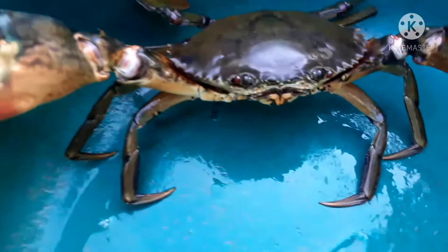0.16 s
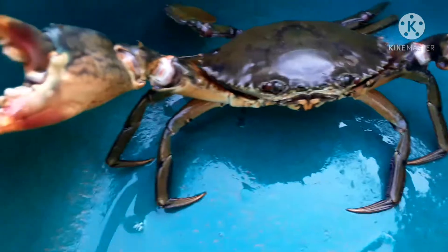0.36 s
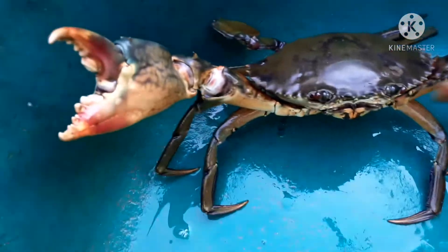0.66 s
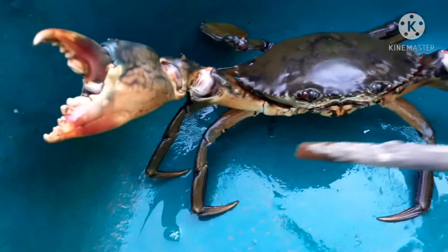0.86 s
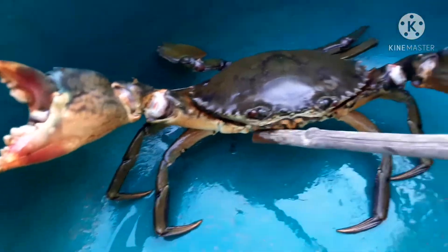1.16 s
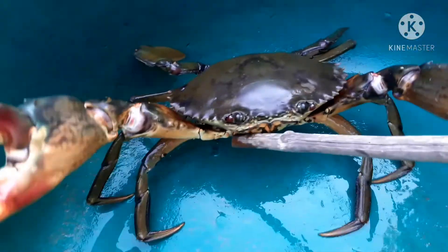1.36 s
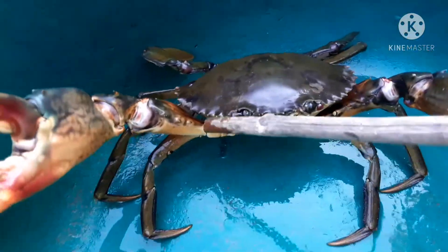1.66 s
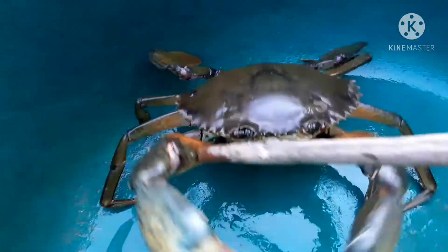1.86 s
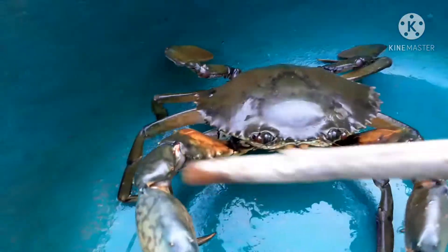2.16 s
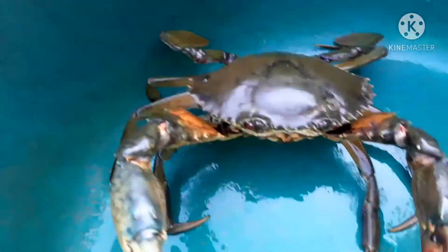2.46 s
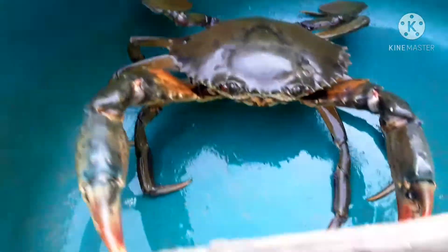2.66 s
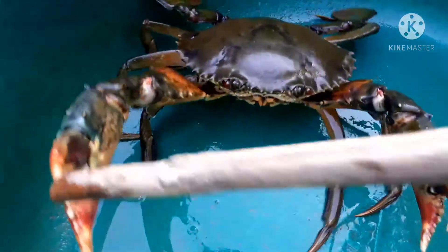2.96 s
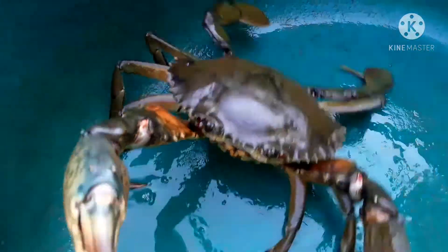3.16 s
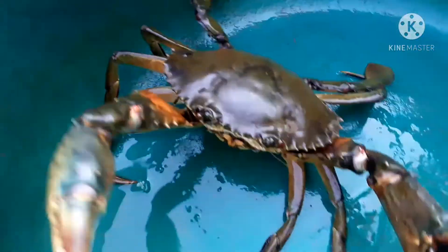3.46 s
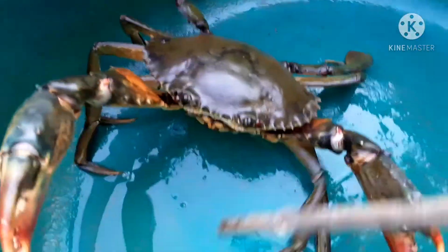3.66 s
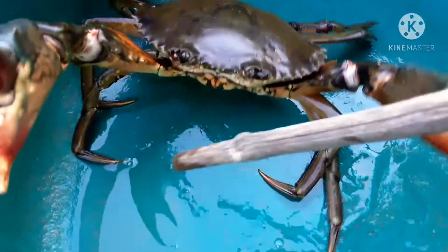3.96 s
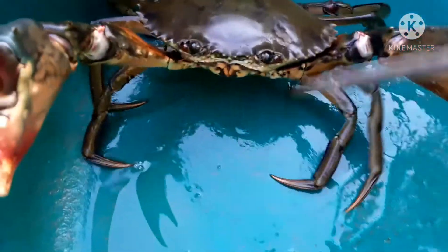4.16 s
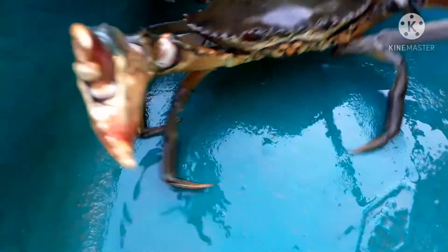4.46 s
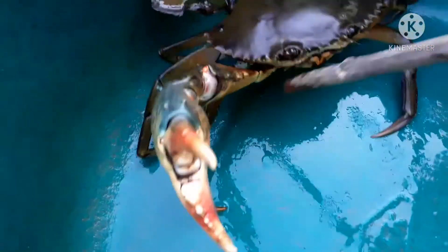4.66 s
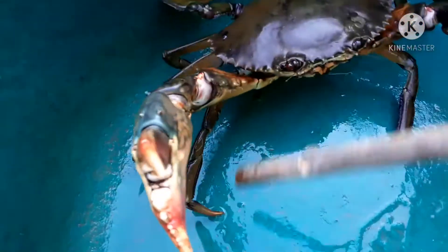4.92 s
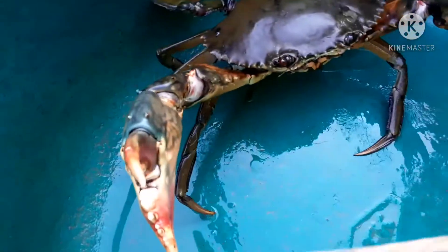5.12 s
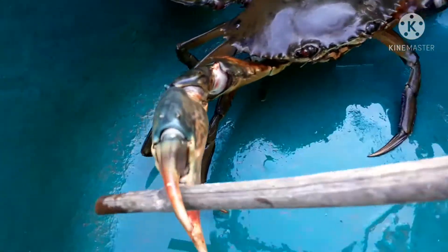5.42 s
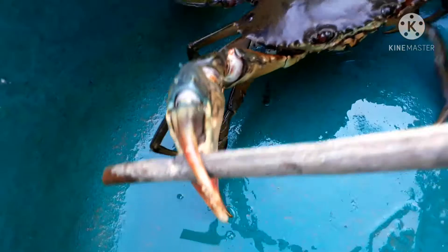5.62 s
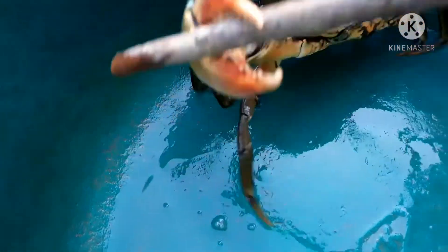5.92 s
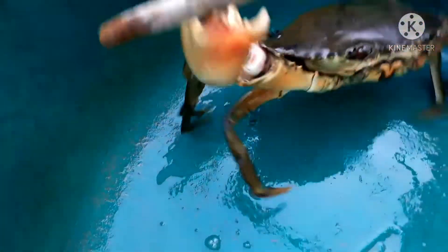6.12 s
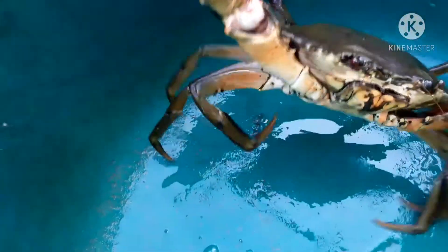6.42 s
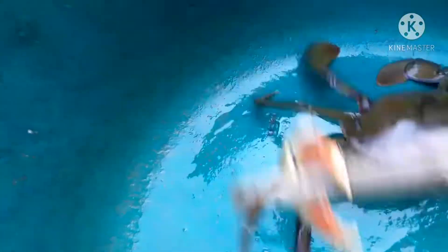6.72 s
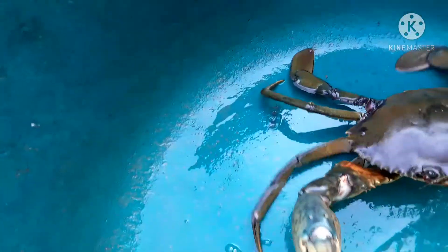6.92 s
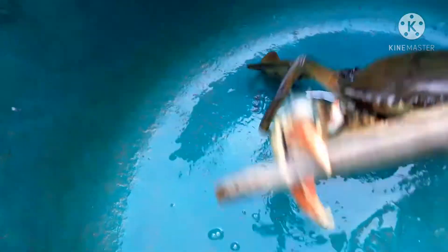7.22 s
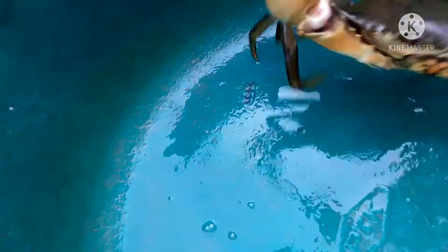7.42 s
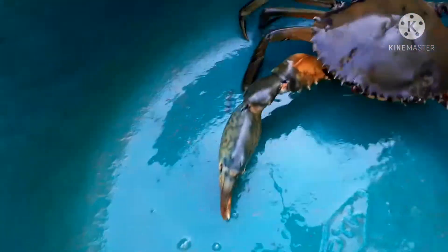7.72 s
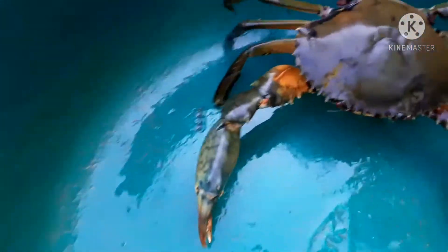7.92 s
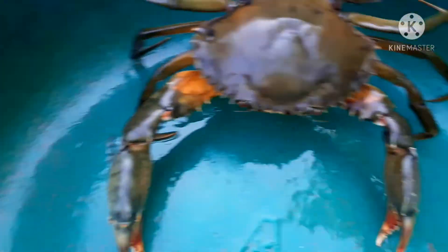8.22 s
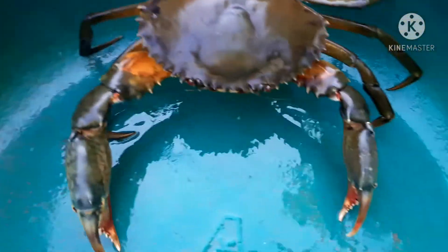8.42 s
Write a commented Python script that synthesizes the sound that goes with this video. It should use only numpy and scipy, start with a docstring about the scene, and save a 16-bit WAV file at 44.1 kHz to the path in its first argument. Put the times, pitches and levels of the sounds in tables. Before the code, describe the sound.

A faint outdoor hiss and a low, wavering distant motor run throughout. In the first two seconds far birds whistle thinly with some echo, while the crab's legs make very quiet scuffs in the wet plastic basin close by. A dry tick at 1.2 and a cluster of clacks around 1.7 mark stick against shell, with tiny very high squeaks near 1.9. Around 3.1 a coarse drag grates over the floor, and a nearby bird chirps brightly in quick notes until 3.75. Sharp clicks at 4.2 lead into busy scuffs and knocks from 4.3 to 4.8. After a lull, clacks rattle at 5.3 and scuffs build near 5.75. Strong wet scrapes grind at 6.2 and 6.7 to 6.9, with a thump at 6.8. The loudest hollow, booming knocks burst at 7.6 to 7.8, then a soft low slide from 8.3 fades with a last small click.

```python
"""A distant motor hums from the start, under faint outdoor hiss and the whistling of far birds.
A crab is prodded with a wooden stick in a wet plastic basin close by: stick-slip scrapes its legs over the floor,
impacts on shell and stick excite short damped modes, and soft and hard thumps set the basin's low modes booming.
Wet shell squeaks briefly, and a nearby bird chirps as a frequency-modulated whistle with faint overtones."""
import sys
import numpy as np
from scipy import signal
from scipy.fft import rfft, irfft
from scipy.io import wavfile
from scipy.ndimage import uniform_filter1d

SR = 44100
rng = np.random.default_rng(int(sys.argv[2]) if len(sys.argv) > 2 else 0)


def output_pcm(signal):
    """Save a mono or channel-first signal as 16-bit PCM at the path in sys.argv[1].

    Samples are clipped to [-1, 1] before scaling.
    """
    pcm = np.clip(np.atleast_2d(signal).T, -1, 1) * 32767
    wavfile.write(sys.argv[1], SR, np.round(pcm).astype(np.int16))


N = 378378

# spectrum of the outdoor hiss: f/Hz, relative level/dB
AIR_SPECTRUM = [(100, 2.5), (600, 5), (1500, -14), (4000, -18), (7500, -14), (10000, -26.5), (15000, -18.5)]
# strength of the distant motor, used relative to its median: t/s, level/dB
MOTOR_LEVEL = [(0.0, -30), (0.5, -39), (1.0, -34), (3.2, -34.5), (4.6, -36), (5.0, -38), (6.8, -36),
               (7.3, -38.5), (8.2, -45), (8.58, -40)]
# spectrum of the motor's rumble: f/Hz, relative level/dB
MOTOR_SPECTRUM = [(15, -73), (25, -51.5), (29, -28.5), (35, -48.5), (54, -3), (70, -2), (108, -1.5),
                  (161, -5), (193, 0.5), (209, -4.5), (227, -9), (265, -20.5), (387, -37.5), (420, -35),
                  (550, -38.5), (920, -120)]
# far birds, one list a syllable: t/s, pitch f/Hz, relative level/dB, rasp/1 (0 to 1)
FAR_SYLLABLES = [
    [(0.008, 3420, -49, 0.45), (0.05, 3030, -53, 0.22), (0.12, 3260, -59, 0.2)],
    [(0.07, 4056, -57, 0.1), (0.12, 4130, -47.5, 0.12), (0.25, 4220, -57, 0.22), (0.38, 4254, -52, 0.26),
     (0.52, 4136, -51, 0.044), (0.61, 4030, -55, 0.037)],
    [(0.355, 2900, -54, 0.15), (0.387, 2150, -61, .15), (0.415, 3150, -58, 0.15), (0.45, 3270, -69, 0.19),
     (0.495, 4000, -47, 0.15)],
    [(0.75, 3420, -68, 0.14), (0.98, 3640, -54, 0.2), (1.15, 3356, -61, 0.043), (1.28, 3420, -54, 0.024)],
    [(0.83, 1574, -67, 0.059), (0.95, 1586, -58, 0.22), (1.06, 1580, -84.5, 0.11)],
    [(1.27, 1450, -68, 0.088), (1.42, 1585, -73.5, 0.17), (1.6, 1430, -64, 0.087)],
    [(1.5, 4350, -69, .1), (1.58, 4530, -63.5, 0.063), (1.78, 4630, -56, 0.13), (1.88, 4580, -52, 0.13)],
    [(5.03, 5130, -67, 0.36), (5.08, 5250, -72, 0.27)],
    [(5.15, 5140, -67, 0.24), (5.22, 5170, -67, 0.27)],
]
# near bird, one list a syllable: t/s, pitch f/Hz, relative level/dB, rasp/1 (0 to 1)
NEAR_SYLLABLES = [
    [(3.025, 2395, -41.5, 0.84), (3.052, 2580, -27.5, 0.36), (3.068, 3296, -19, 0.38),
     (3.085, 3305, -18.5, 0.13), (3.102, 3400, -40.5, .5)],
    [(3.305, 1980, -39.5, 0), (3.322, 1920, -29, 0.1), (3.335, 2680, -24, 0.5), (3.341, 2818, -15, 0),
     (3.354, 2740, -14, 0), (3.374, 2690, -19.5, 0.08)],
    [(3.456, 3660, -68, 0.1), (3.467, 3410, -21.5, 0), (3.473, 2550, -24, 0.17), (3.479, 3275, -18, 0.05),
     (3.488, 3200, -17, 0.12), (3.498, 3310, -26, .05)],
    [(3.562, 1780, -38.5, 0), (3.598, 2240, -33.5, 0.8), (3.606, 2930, -19.5, 0.65),
     (3.614, 3227, -19, 0.5), (3.628, 2850, -24.5, 0.74), (3.657, 2600, -30.5, 0.4),
     (3.683, 2686, -27.5, 0.5), (3.697, 2340, -26, 0), (3.713, 2360, -29, 0.2)],
    [(3.716, 1834, -37.5, 0.3), (3.738, 1983, -28.5, .15), (3.755, 1880, -41, 0)],
]
# wet shell squeaking on plastic, one list a squeak: t/s, pitch f/Hz, relative level/dB, rasp/1 (0 to 1)
SHELL_SQUEAKS = [
    [(1.379, 15000, -43, 0.44), (1.382, 15100, -38, .4), (1.386, 14800, -56, .4)],
    [(1.911, 15300, -37, .4), (1.9135, 15000, -23, 0.44), (1.917, 14800, -46, .4)],
    [(1.943, 14200, -44, .6), (1.946, 12600, -26, 0.73), (1.949, 9500, -46, .6)],
    [(1.953, 15400, -37, .6), (1.955, 12300, -26, .6), (1.958, 6400, -23, .6)],
]
# modes of the basin floor: f/Hz, relative level/dB, decay time t60/s
BASIN_MODES = [(50, -27, 0.27), (178.2, -4, 0.13), (217.7, 4, 0.079), (450, -8, 0.083), (596.4, -4, 0.045),
               (702, -5.5, 0.04), (825.5, -7, 0.083), (1155, -7.5, 0.031), (1357, -6.5, 0.017),
               (1587, -16.5, 0.13), (1774, -24.5, 0.081), (1917, -11, 0.053)]
# soft and hard thumps on the basin, the first a low handling bump: t/s, peak level/dB, contact time/ms
BASIN_THUMPS = [(0.922, -21, 11), (1.856, -24, 1.3), (2.078, -21, 2.2), (4.541, -15.5, 0.31),
                (5.797, -17.5, 0.71), (6.816, -12.5, 2.7), (7.589, -13, 0.98), (7.595, -13, 0.95),
                (7.683, -2.5, 1.07), (7.6911, -1, 1.53), (7.729, -12, 0.8), (7.76, -6, 1.5)]
# modes of shell and stick: f/Hz, relative level/dB, decay time t60/s
SHELL_MODES = [(611, -9.5, 0.04), (1187, -3, 0.042), (1780, -0.5, 0.044), (2080, -7, 0.012),
               (2150, -3, 0.016), (2530, -14, .02), (2983, 4, 0.033), (3400, 0, 0.033), (4350, -33, .016),
               (5590, -12.5, 0.021), (6950, -8, 0.012), (8220, -13.5, 0.014)]
# spectrum of a sharp contact: f/Hz, relative level/dB
CRACK_SPECTRUM = [(150, -7.5), (400, -8.5), (1000, -7), (1800, -2), (3100, -5), (4000, -7.5), (5500, -11),
                  (7400, 1), (8800, -12), (12000, -7.5), (15500, -16)]
# hard contacts of shell, stick and basin: t/s, relative body level/dB, crack level/dB, tick level/dB
HARD_CONTACTS = [(0.231, -39, -57, -51), (0.497, -43, -44.5, -47.5), (1.175, -58, -44.5, -23.5),
                 (1.381, -76, -83, -48), (1.677, -28, -30.5, -44.5), (1.6816, -41.5, -23.5, -35),
                 (1.69, -39.5, -17.5, -30), (1.6962, -28, -19, -29.5), (1.7096, -25, -33, -36),
                 (1.7132, -39, -27, -39), (1.8258, -37, -45, -52), (1.8564, -24.5, -36.5, -39),
                 (2.0779, -20.5, -37.5, -44), (2.5284, -56, -73, -45.5), (2.84, -37.5, -38, -35),
                 (3.015, -35, -66, -51), (3.156, -22, -26, -49), (3.8601, -27, -27.5, -32.5),
                 (3.8857, -31.5, -39, -44), (4.2365, -27, -18, -21), (4.2426, -30, -20, -18.5),
                 (4.4894, -46, -40, -23), (4.5264, -48.5, -41, -30), (4.54, -18.5, -37.5, -46),
                 (4.622, -30, -39.5, -45.5), (4.661, -23, -27, -18.5), (4.694, -34, -33, -29),
                 (4.715, -29, -40, -31.5), (4.7436, -26, -57, -64), (4.784, -32.5, -45, -50),
                 (4.9542, -49, -51.5, -54.5), (5.282, -22.5, -23, -30), (5.335, -29, -25, -33),
                 (5.3471, -22, -22, -28), (5.3633, -28.5, -16.5, -31.5), (5.4353, -30, -15.5, -32.5),
                 (5.4915, -36.5, -35, -64), (6.114, -62, -69, -45.5), (6.7055, -36, -36.5, -31),
                 (6.817, -17, -30, -46), (6.851, -17, -25, -44), (6.9559, -57, -32.5, -19),
                 (7.1542, -37.5, -44.5, -44), (7.2402, -54, -58, -39), (7.2467, -50, -55, -39.5),
                 (7.4296, -32, -35, -32), (7.544, -34, -48, -35), (7.585, -8.5, -26, -33),
                 (7.5952, -31, -22.5, -35), (7.599, -9.5, -37, -56), (7.6809, -12, -21, -27),
                 (7.7274, -33, -33.5, -41), (7.7585, -16, -31.5, -36.5), (8.5667, -56, -33.5, -38)]
# spectrum of leg tips and water film: f/Hz, relative level/dB
SCRAPE_SPECTRUM = [(88, -54), (150, 4.5), (193, 5), (339, -13.5), (436, -1.5), (668, -3.5), (966, -10.5),
                   (1340, -8), (1630, -12), (2410, -23), (3910, -24.5), (5760, -32), (7560, -27.5),
                   (8830, -38.5), (15500, -24.5)]
# scuffs and wet slides of the legs, short and long:
# t/s, length/s, relative basin body level/dB, rasp level/dB, wet hiss level/dB
LEG_SCUFFS = [(0.0, .09, -55.5, -62, -62), (0.097, 0.13, -48.5, -57.5, -55.5),
              (0.256, 0.062, -51.5, -61, -65), (0.487, 0.025, -57, -61, -63),
              (0.603, 0.042, -83, -81, -57.5), (0.638, .49, -88, -96.5, -62), (1.12, .025, -49, -66.5, -75),
              (1.187, .08, -63, -69, -64), (1.417, 0.078, -53.5, -59.5, -63),
              (1.615, 0.13, -50.5, -55, -50.5), (1.847, 0.17, -48.5, -53, -48.5),
              (1.932, 0.129, -44, -46, -47), (2.258, 0.14, -46.5, -59, -57),
              (2.525, 0.06, -48, -59.5, -57.5), (2.574, 0.13, -47, -54.5, -58),
              (2.816, 0.078, -52, -59, -55), (3.418, .06, -51, -57.5, -63), (3.583, 0.072, -47, -47, -48),
              (3.656, 0.079, -47.5, -60, -50), (3.79, .05, -46.5, -54, -48), (3.87, 0.025, -43, -43, -54),
              (3.941, 0.058, -45, -40, -37), (4.022, 0.25, -55.5, -59, -57.5),
              (4.305, 0.069, -46.5, -48, -45.5), (4.35, 0.015, -29, -34.5, -58),
              (4.395, 0.098, -38.5, -40, -43), (4.502, .07, -41, -39.5, -38.5),
              (4.61, 0.021, -48, -32.5, -44), (4.656, 0.075, -37.5, -37, -49),
              (4.777, 0.039, -48.5, -38, -46.5), (5.46, 0.1, -60, -56, -57),
              (5.619, 0.029, -40, -50, -56.5), (5.69, 0.05, -37.5, -41.5, -47.5),
              (5.748, 0.048, -29, -31.5, -39.5), (5.841, .11, -36, -44, -55.5),
              (5.965, 0.095, -32.5, -44, -53.5), (6.935, 0.049, -32.5, -38, -43),
              (7.025, .04, -44.5, -41, -49), (7.056, 0.17, -52, -50.5, -54.5),
              (7.241, 0.062, -37, -40.5, -45), (7.315, .15, -50, -46, -49),
              (7.52, 0.074, -40.5, -34.5, -35.5), (7.596, .035, -23, -33, -63),
              (7.662, 0.029, -30, -31, -41), (7.76, 0.17, -46.5, -50, -57.5),
              (8.005, 0.17, -51.5, -63, -70.5), (8.306, 0.48, -40, -55.5, -66.5)]
# long drags of the whole crab, one curve each: t/s, relative basin body level/dB, rasp level/dB, hiss level/dB
CRAB_DRAGS = [
    [(2.92, -53, -60.5, -57), (2.956, -44.5, -71.5, -61), (3.01, -43.5, -53.5, -61),
     (3.056, -43, -50.5, -44.5), (3.136, -27, -26.5, -37), (3.248, -29.5, -33, -38.5),
     (3.284, -39.5, -42, -47), (3.34, -36.5, -38.5, -50), (3.41, -54, -69, -71)],
    [(6.13, -50, -74, -79), (6.15, -38, -46, -50), (6.226, -36, -32, -41.5), (6.244, -24.5, -28.5, -35.5),
     (6.29, -24, -29, -29.5), (6.334, -35.5, -31.5, -32), (6.412, -28, -39.5, -44), (6.424, -37, -48, -55),
     (6.5, -42, -46, -49)],
    [(6.5, -45.5, -42.5, -45), (6.606, -49, -44, -38), (6.672, -27.5, -26.5, -36),
     (6.71, -28.5, -33.5, -32), (6.764, -24.5, -26.5, -36), (6.776, -35, -22.5, -25),
     (6.826, -19, -23.5, -33), (6.888, -33.5, -39.5, -42), (6.92, -57, -44, -46)],
]
# hiss of the water film under the restless crab, faintest while it stands still: t/s, relative level/dB
FILM_LEVEL = [(0.0, -67.5), (1.4, -70.5), (2.2, -74), (4.0, -68.5), (4.8, -65.5), (4.95, -81), (5.3, -72.5),
              (5.55, -65), (7.9, -66), (8.05, -82)]
# balance of the rasp's upper and lower halves over time: t/s, upper over lower level/dB
RASP_BALANCE = [(0.0, -2.5), (2.0, -2.5), (3.2, -7.5), (4.7, -6), (5.75, -7.5), (6.05, 0.5), (6.3, 3),
                (6.75, -3.5), (7.2, -2), (8.0, -7)]

# pitch of a contact with crack and body columns equal, and the excess of crack that raises it an octave
CRACK_HZ, HARDNESS_DB_PER_OCTAVE = 1800, 31.5
# a scuff takes hold over part of its length; its decay time is this plus its length
ATTACK_SHARE, RELEASE_T60_S = 0.27, 0.059
DRAG_GAIN_DB = np.array([[-0.27], [1.17], [1]])  # gain of the drags in body, rasp, hiss
TOP_HZ = 15750


def undb(db):
    """Decibel law: level to amplitude ratio."""
    return 10 ** (np.asarray(db) / 20)


def unit(x):
    """Normalisation to an rms of 1."""
    return x / np.sqrt(np.mean(x ** 2) + 1e-18)


def unit_energy(x):
    """Normalisation to a total energy of 1."""
    return x / np.sqrt(np.sum(x ** 2))


def curves(rows):
    """Linear interpolation of each table column over the whole time."""
    s, *columns = np.transpose(rows)
    return [np.interp(np.arange(N) / SR, s, c) for c in columns]


def add(out, s, x):
    """Superposition of x on out from time s."""
    i = max(int(s * SR), 0)
    out[i:i + len(x)] += x[:max(N - i, 0)]


def walk(rate, size=N):
    """Smoothed random steps, rate per second, with a spread of about 1."""
    k = max(int(SR / rate), 1)
    steps = np.repeat(rng.standard_normal(size // k + 1), k)
    return np.sqrt(3 / 2) * uniform_filter1d(steps, k)[:size]


def fade(t, t60):
    """Exponential decay of 60 dB in t60 seconds."""
    return np.exp(-np.log(1000) * t / max(t60, 1e-4))


def colour(x, points, size=8192):
    """Minimum-phase filter through (f/Hz, level/dB) points, by folding the cepstrum."""
    hz, db = np.transpose(points)
    bins_hz = np.arange(size // 2 + 1) * SR / size
    gain = undb(np.interp(np.log(bins_hz + 1), np.log(hz), db))
    cepstrum = irfft(np.log(gain))
    cepstrum[1:size // 2] *= 2
    cepstrum[size // 2 + 1:] = 0
    response = irfft(np.exp(rfft(cepstrum, size)))
    return through(x, response)


def band(x, lo_hz, hi_hz, order=3):
    """Butterworth band-pass filter."""
    edges_hz = [lo_hz, min(hi_hz, SR * .49)]
    return signal.sosfilt(signal.butter(order, edges_hz, "band", fs=SR, output="sos"), x)


def through(x, response):
    """Convolution: the output of a linear system with this impulse response."""
    return signal.fftconvolve(x, response)[:len(x)]


def ring(modes, scatter_db, detune, size=6000):
    """Modal superposition: damped sines of unit total energy, weighted anew for each contact point."""
    t = np.arange(size) / SR
    y = np.zeros(size)
    for hz, db, t60 in modes:
        weight, shift, sign = rng.standard_normal(3)
        gain = np.sign(sign) * undb(db + scatter_db * weight)
        y += gain * fade(t, t60) * np.sin(2 * np.pi * hz * (1 + detune * shift) * t)
    return unit_energy(y)


def air():
    """Broadband noise: a faint, even outdoor hiss."""
    return undb(-63) * unit(colour(rng.standard_normal(N), AIR_SPECTRUM))


def hum():
    """Narrow-band noise plus a frequency-modulated tone: the distant motor's rumble and wavering note."""
    db, = curves(MOTOR_LEVEL)
    rumble = unit(colour(rng.standard_normal(N), MOTOR_SPECTRUM)) * undb(walk(9))
    pitch_hz = 195 * (1 + 0.027 * walk(14))
    tone = np.sin(2 * np.pi * np.cumsum(pitch_hz) / SR) * undb(0.79 * walk(21))
    return unit(rumble + undb(-3.5) * tone) * undb(-35.2 + db - np.median(db))


def yard(x, wet_db, t60, size=30000):
    """Diffuse reflection: scattered, decaying echoes from walls and trees."""
    echoes = rng.standard_normal(size) * fade(np.arange(size) / SR, t60)
    echoes[:int(.012 * SR)] = 0  # no echo in the first 12 ms
    return x + undb(wet_db) * through(x, unit_energy(echoes))


def song(syllables, rasp_depth, rasp_rate, overtone_db, trill_depth=0, trill_hz=0):
    """Frequency and amplitude modulation: a gliding whistle with overtones, roughened by flutter and trill."""
    out = np.zeros(N)
    for rows in syllables:
        s, *columns = np.transpose(rows)
        t = np.arange(s.min(), s.max(), 1 / SR)
        hz, db, rasp = (np.interp(t, s, c) for c in columns)
        trill = trill_depth * np.sin(2 * np.pi * trill_hz * (t - t[0]))
        wobble = rasp_depth * walk(rasp_rate, size=len(t)) + trill
        phase = 2 * np.pi * np.cumsum(hz * (1 + rasp * wobble)) / SR
        flutter = (1 + rasp * walk(rasp_rate, size=len(t))) / np.sqrt(1 + rasp ** 2)
        edges = np.clip(np.minimum(t - t[0], t[-1] - t) / 0.0057, 0, 1)
        # overtones above half the sample rate are left out
        overtones = sum(np.sin(k * phase) * (k * hz < SR / 2) / np.sqrt(k) for k in range(2, 5))
        whistle = np.sin(phase) + undb(overtone_db) * overtones
        add(out, t[0], np.sqrt(2) * undb(db) * edges * flutter * whistle)
    return out


def birds():
    """Direct-to-reverberant ratio as distance: one bird close by, others far off with much echo."""
    far = song(FAR_SYLLABLES, rasp_depth=.03, rasp_rate=350, overtone_db=-45, trill_depth=.15, trill_hz=108)
    near = song(NEAR_SYLLABLES, rasp_depth=.07, rasp_rate=1100, overtone_db=-32, trill_depth=.11, trill_hz=290)
    return undb(-7.5) * yard(far, wet_db=0, t60=.32) + undb(-1) * yard(near, wet_db=-12, t60=.36)


def squeaks():
    """Periodic stick-slip: wet shell sticks and slips so fast that it whistles."""
    whistle = song(SHELL_SQUEAKS, rasp_depth=.06, rasp_rate=3100, overtone_db=-40)
    return undb(7) * band(whistle, 6000, 18000)


def thumps():
    """Contact time as a low-pass filter: a softer, longer push leaves only the basin's lowest modes."""
    out = np.zeros(N)
    for s, peak_db, contact_ms in BASIN_THUMPS:
        push = np.hanning(max(int(contact_ms * SR / 1000), 3))
        boom = through(ring(BASIN_MODES, scatter_db=3.9, detune=.004), push)
        boom = band(boom, 49, 5000, order=1)
        add(out, s, undb(peak_db) * boom / np.abs(boom).max())
    return out


def clacks(size=3000):
    """Impact excitation: a crack with a crumbling tail rings the shell; harder contacts pitch it higher."""
    out, t = np.zeros(N), np.arange(size) / SR
    for s, body_db, crack_db, tick_db in HARD_CONTACTS:
        octaves = np.clip((crack_db - body_db) / HARDNESS_DB_PER_OCTAVE, -.6, .7)
        hz = CRACK_HZ * 2 ** octaves
        push = undb(-21) * rng.standard_normal(size) * fade(t, .025)
        push[0] += 1
        crack = colour(push, CRACK_SPECTRUM)
        # the struck spot itself rings for only a few cycles
        crack = crack + undb(5) * band(crack, hz / 1.15, hz * 1.27, order=1)
        blow = unit_energy(crack) + undb(-9) * ring(SHELL_MODES, scatter_db=3, detune=.03, size=size)
        # the rough shell skids a little as it lands, which spreads the treble over a few milliseconds
        skid = colour(rng.standard_normal(size) * fade(t, .02), CRACK_SPECTRUM)
        body = unit(band(blow, 230, 850)) * undb(body_db - 13.5)
        snap = unit(band(blow, 1100, 5100)) * undb(crack_db - 10.5)
        tick = unit(band(unit(blow) + unit(skid), 4800, 19000, order=4)) * undb(tick_db - 11)
        add(out, s, body + snap + tick)
    return out


def slips(rate, spread_db):
    """Random stick-slip: tiny releases, rate per second on average, most weak and a few strong."""
    size = undb(spread_db * np.minimum(rng.exponential(size=N), 3.5))
    x = (rng.random(N) < rate / SR) * size * rng.choice([-1, 1], N)
    return unit(x)


def leg_tip(t60, size=400):
    """Dense modal overlap: a contact point rings as decaying noise of unit energy."""
    return unit_energy(rng.standard_normal(size) * fade(np.arange(size) / SR, t60))


def strokes(grit, response, size=3000):
    """Moving excitation: the leg tips move on, so every short overlapping stroke meets a new response."""
    out = np.zeros(N)
    for i in range(0, N, size // 2):
        stroke = grit[i:i + size]
        window = np.hanning(size)[:len(stroke)]
        add(out, i / SR, signal.fftconvolve(stroke * window, response()))
    return unit(out)


def leg_pressure():
    """Power envelopes of body, rasp and hiss: scuffs and slides rise, hold and let go; drags follow curves."""
    t = np.arange(N) / SR
    power = np.zeros((3, N))
    power[2] = undb(curves(FILM_LEVEL)[0]) ** 2
    for s, length, *db in LEG_SCUFFS:
        age = t[:int((length + .5) * SR)]
        attack = np.minimum(age / max(ATTACK_SHARE * length, 1e-3), 1)
        # once the leg lets go, a long scuff dies away more slowly
        release = fade(np.maximum(age - length, 0), RELEASE_T60_S + length)
        for layer, gain in zip(power, undb(db)):
            add(layer, s, (gain * attack * release) ** 2)
    for rows in CRAB_DRAGS:
        outside_s = np.abs(t - np.clip(t, rows[0][0], rows[-1][0]))
        edges = fade(np.minimum(outside_s, 1), RELEASE_T60_S)
        drag = undb(curves(rows) + DRAG_GAIN_DB) * edges
        power = np.maximum(power, drag ** 2)
    return np.sqrt(power)


def scraping():
    """Stick-slip friction: juddering slips shake the basin, rasp in the leg tips and hiss in the water film."""
    body_gain, rasp_gain, hiss_gain = leg_pressure()
    judder = undb(2.5 * walk(115))
    grit = slips(rate=900, spread_db=4.7) + undb(-10) * rng.standard_normal(N)
    grit = unit(grit * judder)
    basin = strokes(grit, lambda: ring(BASIN_MODES, scatter_db=3, detune=.025, size=2400))
    tips = unit(colour(strokes(grit, lambda: leg_tip(t60=.005)), SCRAPE_SPECTRUM))
    film = unit(colour(rng.standard_normal(N), SCRAPE_SPECTRUM))

    body = unit(band(tips + undb(2.5) * basin, 204, 900))
    balance = undb(curves(RASP_BALANCE)[0])
    lower = unit(band(tips + undb(0.5) * basin, 890, 2200))
    upper = unit(band(tips + undb(-6) * film, 1930, 4970))
    rasp = (lower + balance * upper) / np.sqrt(1 + balance ** 2)
    # a leg that presses hard grinds; a light one glides on the water with a smooth hiss
    grip = np.clip((20 * np.log10(rasp_gain + 1e-9) + 81) / 28, .1, .92)
    glide = np.sqrt(np.maximum(1 - grip ** 2, 0))
    hiss = grip * unit(band(tips, 4360, 14770)) + glide * unit(band(film, 5200, 14770))
    return body * body_gain * undb(3.15) + rasp * rasp_gain * undb(3.64) + hiss * hiss_gain * undb(1.16)


def scene():
    """Superposition of all sources, from the background to the crab, in one channel."""
    return (air() + hum() + birds() + squeaks() + thumps() + clacks() + scraping())[None]


def record(dry):
    """Saturation and band limiting: peaks clip at full scale and an elliptic low-pass cuts the highest treble."""
    low_pass = signal.ellip(8, .2, 70, TOP_HZ, fs=SR, output="sos")
    return signal.sosfilt(low_pass, np.clip(dry, -1, 1))


dry = scene()
out = record(dry)
output_pcm(out)
```